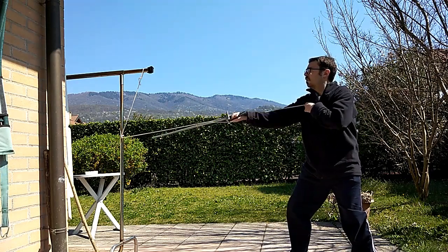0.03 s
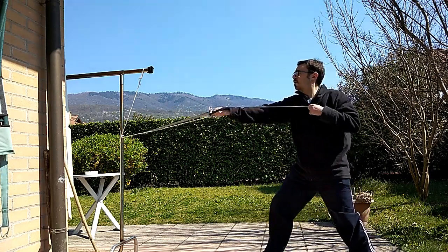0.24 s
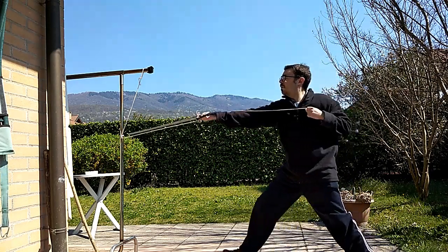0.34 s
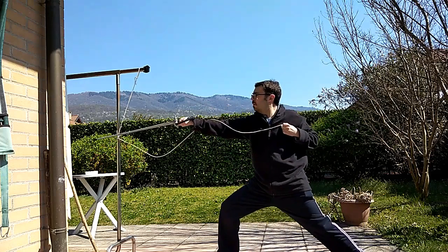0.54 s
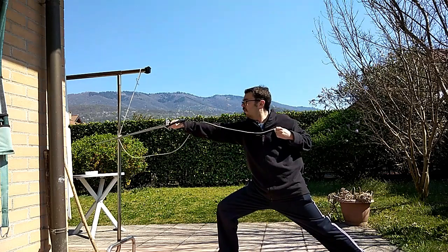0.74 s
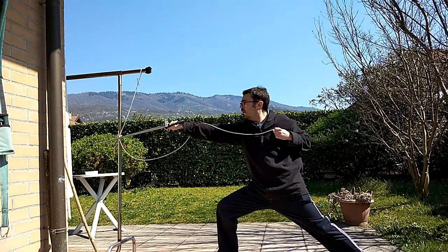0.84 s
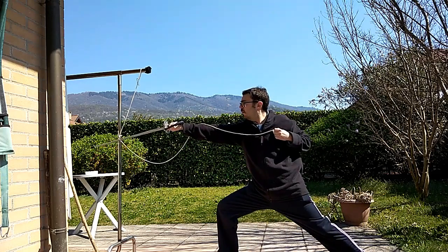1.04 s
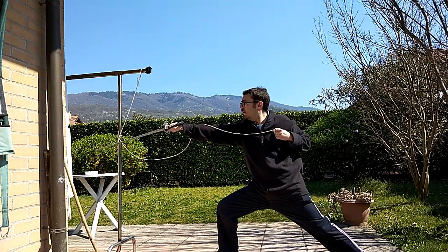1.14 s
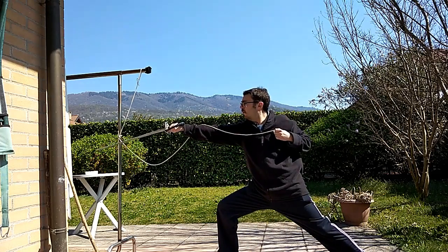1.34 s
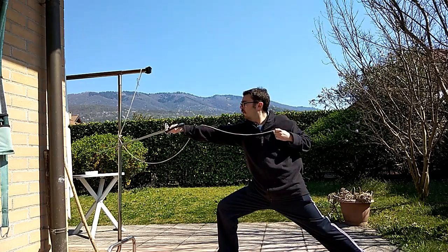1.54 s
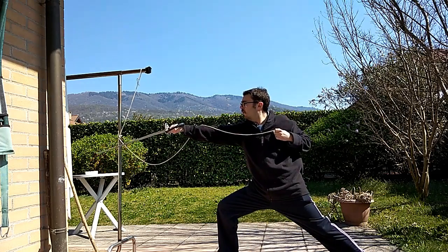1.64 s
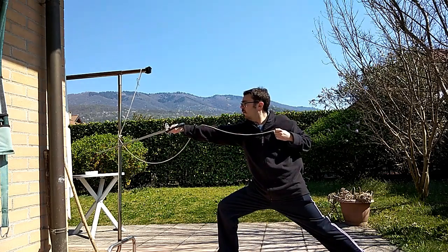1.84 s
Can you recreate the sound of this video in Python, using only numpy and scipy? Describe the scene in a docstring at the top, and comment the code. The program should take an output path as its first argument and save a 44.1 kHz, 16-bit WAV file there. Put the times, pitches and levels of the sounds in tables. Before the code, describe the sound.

A thin blade clacks sharply against a metal stand after a brief scrape along a cord, then rattles ever more weakly as the steel rings. Feet thud on patio tiles, with a short wall echo and a faint low drone.

```python
"""A thin blade scrapes along a cord hung from a metal stand as a fencer lunges on a patio.
The blade clacks against the stand and rattles on it ever more weakly, leaving the steel ringing,
while feet and the stand's base thud on the tiles. The house wall answers; a low drone and a few
faint far chirps lie underneath."""
import sys
import numpy as np
from scipy import signal
from scipy.fft import rfft, irfft, next_fast_len
from scipy.io import wavfile
from scipy.ndimage import map_coordinates

SR = 44100
rng = np.random.default_rng(int(sys.argv[2]) if len(sys.argv) > 2 else 0)


def bounce(signal):
    """Save signal as a 16-bit WAV file at the path given by the first command-line argument."""
    frames = np.transpose(np.atleast_2d(signal))
    limited = np.clip(frames, -1, 1)
    pcm = np.round(limited * 32767).astype(np.int16)
    wavfile.write(sys.argv[1], SR, pcm)


N = 83790
T = np.arange(N) / SR
LEFT_LAG_S = 0.00018


def amp(db):
    """Decibels to gain."""
    return 10 ** (np.asarray(db) / 20)


def decay(t, t60_s):
    """Exponential fall, 60 dB in t60_s."""
    return amp(-60 * t / t60_s)


def unit_rms(x):
    """Scale to rms 1."""
    return x / np.sqrt(np.mean(x ** 2) + 1e-20)


def curve_at(points, hz):
    """Interpolate (f/Hz, value) points on a log axis."""
    point_hz, values = np.transpose(points)
    return np.interp(np.log(hz + 0.0015), np.log(point_hz), values)


def wobble(rate_hz):
    """Smooth random curve with rate_hz knots a second."""
    return map_coordinates(rng.standard_normal(N // 4), [T * rate_hz + 2], mode="wrap")


def pan(pan_db):
    """Stereo gains for a left-minus-right level."""
    return amp(np.array([[0.5], [-0.5]]) * pan_db)


def add(out, start_s, sound):
    """Mix a sound in at start_s."""
    start = round(start_s * SR)
    out[:, start:start + sound.shape[1]] += sound[:, :N - start]


def mode(t, hz, t60_s, pan_db):
    """One damped vibration, slightly later on the left."""
    t = np.maximum(t - np.array([[LEFT_LAG_S], [0]]), 0)
    return decay(t, t60_s) * np.sin(2 * np.pi * hz * t) * pan(pan_db)


# left-right likeness: f/Hz, correlation
COHERENCE = [(100, 0.82), (300, .94), (600, .92), (1200, 0.42), (2500, 0.23), (5000, .3), (8300, 0.2)]
def shaped_noise(envelope, spectrum, pan_db):
    """Enveloped stereo noise rung through a minimum-phase filter, at the envelope's rms before panning."""
    size = len(envelope)
    n_fft = 2 * next_fast_len(size // 2 + 2048)
    hz = np.fft.rfftfreq(n_fft, 1 / SR)
    cepstrum = irfft(np.log(amp(curve_at(spectrum, hz))))
    causal = np.r_[1, np.full(n_fft // 2 - 1, 2), np.zeros(n_fft // 2)]
    response = np.exp(rfft(cepstrum * causal))
    mid, side = rfft(rng.standard_normal((2, size)) * envelope, n_fft) * response
    width = np.arccos(curve_at(COHERENCE, hz)) / 2
    mid, side = mid * np.cos(width), side * np.sin(width)
    left = (mid + side) * np.exp(-2j * np.pi * hz * LEFT_LAG_S)
    stereo = irfft([left, mid - side])[:, :size]
    return unit_rms(stereo) * np.sqrt(np.mean(envelope ** 2)) * pan(pan_db)


# air spectrum: f/Hz, level/dB
AIR_SPECTRUM = [(150, -1), (220, 0), (400, -18.5), (520, -13), (900, -20), (1450, -13.5),
                (2900, -25.5), (7100, -25.5), (14000, -31.5)]
def air():
    """Still air: a faint, steady noise."""
    return shaped_noise(np.full(N, amp(-77)), AIR_SPECTRUM, pan_db=-1.5)


# drone envelopes: t/s, upper/dB, lower/dB
DRONE_LEVELS = [(0.0, -79, -76), (0.074, -58.5, -66), (0.19, -92, -71), (0.28, -55, -57), (0.312, -79, -68),
                (0.444, -62.5, -77), (0.522, -74, -72.5), (0.84, -64.5, -62.5), (0.888, -80, -74),
                (0.952, -68, -69), (1.004, -68.5, -61.5), (1.136, -67, -76), (1.168, -53.5, -67.5),
                (1.418, -68, -64.5), (1.46, -51, -54.5), (1.502, -60, -66.5), (1.766, -58, -59.5),
                (1.9, -66, -73)]
# rumble spectrum: f/Hz, level/dB
RUMBLE_SPECTRUM = [(25, -36), (42, -20.5), (56, 6.5), (85, -4), (115, 3.5), (150, -7), (250, -18.5),
                   (380, -26.5), (900, -53)]
def drone(upper_hz=105.2, lower_hz=65.3, waver_rad=0.9):
    """Two wavering low tones in a rumble that swells with the lower one."""
    times_s, upper_db, lower_db = np.transpose(DRONE_LEVELS)
    upper = amp(np.interp(T, times_s, upper_db))
    lower = amp(np.interp(T, times_s, lower_db))
    tones = np.zeros(N)
    for hz, envelope in ((upper_hz, upper), (lower_hz, lower)):
        flutter = amp(4.9 * wobble(7.4))
        phase = 2 * np.pi * hz * T + waver_rad * wobble(11)
        tones += envelope * unit_rms(flutter * np.sin(phase))
    return amp(-2) * tones + shaped_noise(amp(-1) * lower, RUMBLE_SPECTRUM, pan_db=4)


# far chirps: t/s, length/s, f/Hz, level/dB
FAR_CHIRPS = [(1.394, 0.016, 1200, -70), (1.416, 0.083, 1360, -75), (1.482, 0.028, 1130, -75.5),
              (1.865, .03, 1520, -74.5)]
def far_chirps():
    """Short, faint tones with a jittering pitch."""
    out = np.zeros(N)
    for start_s, length_s, hz, db in FAR_CHIRPS:
        swell = np.sin(np.pi * np.clip((T - start_s) / length_s, 0, 1))
        out += amp(db) * swell * np.sin(2 * np.pi * hz * T + 1.2 * wobble(390))
    return out


# patio decay: f/Hz, t60/s
PATIO_T60 = [(100, 0.97), (400, 0.74), (1200, 0.6), (2000, 0.41), (5000, 0.44), (8000, 0.26), (14000, 0.15)]
# reverb send: f/Hz, level/dB
PATIO_SPECTRUM = [(100, -9.5), (500, -16.5), (1200, -8.5), (2000, -12), (5000, -16.5), (10000, -20)]
def patio_reverb(x, delay_s=0.013):
    """Walls and paving answer with a tail whose treble dies first."""
    hz, t, noise = signal.stft(rng.standard_normal((2, SR)), SR, nperseg=256)
    fade = decay(t, curve_at(PATIO_T60, hz)[:, None])
    energy = SR * np.mean(fade ** 2, axis=1, keepdims=True)
    gain = amp(curve_at(PATIO_SPECTRUM, hz))[:, None] / np.sqrt(energy)
    tail = signal.istft(noise * fade * gain, SR, nperseg=256)[1]
    tail = np.pad(tail, ((0, 0), (round(delay_s * SR), 0)))
    return signal.fftconvolve(x, tail, axes=1)[:, :N]


def wall_reflections(x, count=8, total_db=-10, highpass_hz=800):
    """Early echoes off house wall and paving colour the treble differently on each side."""
    taps = np.zeros((2, SR // 10))
    for side in taps:
        delays_s = rng.uniform(0.004, 0.028, count)
        side[(delays_s * SR).astype(int)] = rng.choice([-1, 1], count) * amp(total_db) / np.sqrt(count)
    treble = signal.sosfilt(signal.butter(2, highpass_hz, "high", fs=SR, output="sos"), x)
    return signal.fftconvolve(treble, taps, axes=1)[:, :N]


# base landings: t/s, relative level/dB
BASE_KNOCKS = [(1.611, -41), (1.685, -63), (1.75, -65)]
# base resonances: f/Hz, level/dB
BASE_SPECTRUM = [(200, -19), (420, -24.5), (510, -7), (570, -7.5), (680, 4.5), (750, -4), (860, -32),
                 (1200, -25.5), (1650, -20), (1830, -5), (2200, -15.5), (2700, -40.5), (3300, -22.5),
                 (5000, -34.5), (7700, -29.5), (9500, -57), (14000, -61)]
def base_knocks(rise_s=0.0015):
    """The stand's base rocks back onto the tiles with a hollow knock."""
    out, t = np.zeros((2, N)), T[:SR // 3]
    blow = (1 - np.exp(-t / rise_s)) * decay(t, t60_s=0.15)
    for start_s, db in BASE_KNOCKS:
        add(out, start_s, shaped_noise(amp(db - 2.5) * blow, BASE_SPECTRUM, pan_db=-4))
    return out


# thump spectrum: f/pitch, level/dB
THUMP_SPECTRUM = [(.1, -32), (.45, -5.5), (.75, -10), (1, -1.5), (1.25, -6.5), (1.7, -16), (4, -49.5),
                  (12, -60.5)]
def thump(t, rise, pitch_hz):
    """A dull impact: a band of noise and a damped tone at one pitch."""
    spectrum = [(pitch_hz * ratio, db) for ratio, db in THUMP_SPECTRUM]
    noise = shaped_noise(rise * decay(t, t60_s=0.2), spectrum, pan_db=-0.5)
    tone = rise * mode(t, pitch_hz, t60_s=0.13, pan_db=4.5)
    return amp(-3.5) * noise + amp(-1.5) * tone


# landings, levels relative: t/s, thump/dB, thump/Hz, slap/dB, slap/Hz, grit/dB, tube/dB
TILE_THUDS = [(0, -61, 211.8, -69, 365, -84, -109.5), (.253, -40, 328.6, -44.5, 644, -55, -64),
              (.268, -43, 205, -49, 441, -68, -72), (0.311, -49.5, 296, -58, 600, -65.5, -64.5),
              (.389, -55, 139.8, -43.5, 266.6, -58, -76.5), (0.442, -44.5, 277, -48, 489, -45, -66),
              (0.593, -46.5, 261, -53.5, 334, -63, -71), (0.659, -60, 224, -66, 293, -64, -66),
              (0.934, -41.5, 355, -46.5, 594.4, -49.5, -64), (0.952, -46.5, 147.2, -46, 229, -73, -80),
              (1.018, -55, 199.6, -68, 456, -70.5, -81), (1.159, -48, 192, -53, 440, -65.5, -66.5),
              (1.275, -46, 249, -65.5, 555, -66.5, -76), (1.621, -45, 268, -49.5, 357, -59.5, -73.5)]
# spectra of grit and of the stand's tube (also struck by the blade): f/Hz, level/dB
GRIT_SPECTRUM = [(300, -9.5), (900, 5), (1600, 5), (2300, 3.5), (3200, -8), (5000, -12.5), (7700, -12.5),
                 (9500, -38), (14000, -47.5)]
TUBE_SPECTRUM = [(600, -17.5), (1400, -12.5), (1700, -9.5), (1870, 7.5), (2080, 6), (2280, 1), (2700, -15),
                 (4000, -35)]
def tile_thuds(rise_s=0.00075):
    """Weight lands on the tiles: a low thump, a hollow slap, grit and a shake of the stand's tube."""
    out, t = np.zeros((2, N)), T[:SR // 3]
    rise = 1 - np.exp(-t / rise_s)
    crunch = rise * decay(t, t60_s=0.27)
    for start_s, thump_db, thump_hz, slap_db, slap_hz, grit_db, tube_db in TILE_THUDS:
        low = amp(thump_db) * thump(t, rise, thump_hz)
        slap = amp(slap_db) * thump(t, rise, slap_hz)
        grit = shaped_noise(amp(grit_db) * crunch, GRIT_SPECTRUM, pan_db=-9)
        tube = shaped_noise(amp(tube_db) * crunch, TUBE_SPECTRUM, pan_db=-0.5)
        add(out, start_s, low + slap + grit + tube)
    return amp(-0.5) * out


# strokes on the cord, levels relative: t/s, length/s, hiss/dB, rasp/dB
CORD_STROKES = [(0, 0.077, -70.5, -83), (0.079, 0.29, -63, -75), (0.11, 0.03, -49, -50),
                (0.21, 0.056, -46.5, -52), (.27, 0.048, -79, -65), (1.278, 0.018, -67, -83),
                (1.338, 0.036, -79, -85)]
# scrape spectra: f/Hz, level/dB
HISS_SPECTRUM = [(3000, -37), (6000, -23.5), (6900, -6), (7350, -3), (8100, -8.5), (9000, -26.5),
                 (11000, -25), (14000, -40)]
RASP_SPECTRUM = [(400, -23.5), (1100, -12.5), (1500, -2.5), (2300, 1), (3300, 0.5), (5500, 3.5),
                 (9000, 6.5), (12000, -19.5), (14000, -35)]
def cord_scrapes(attack_s=0.021, roughness_db=0.5):
    """The edge slides over the cord's fibres: a grainy hiss in the blade above a broad rasp."""
    hiss_envelope, rasp_envelope = np.zeros((2, N))
    for start_s, length_s, hiss_db, rasp_db in CORD_STROKES:
        attack = np.clip((T - start_s) / attack_s, 0, 1)
        release = decay(np.maximum(T - start_s - length_s, 0), t60_s=0.1)
        hiss_envelope += amp(hiss_db) * attack * release
        rasp_envelope += amp(rasp_db) * attack * release
    fibres = amp(roughness_db * wobble(600))
    hiss = shaped_noise(hiss_envelope * fibres, HISS_SPECTRUM, pan_db=-6.5)
    rasp = shaped_noise(rasp_envelope * fibres, RASP_SPECTRUM, pan_db=-12)
    return amp(-5) * (hiss + rasp)


# the stand's steel modes: f/Hz, level/dB
STEEL_MODES = [(1818, -3.5), (1877, -5.5), (1913, -6.5), (2230, -7), (2497, -7.5), (3499, -6.5),
               (4339, -6.5), (5245, -3)]
def steel_ring(t, spread_db=1.6):
    """The struck steel rings, each mode with a random strength and phase on each side."""
    ring = np.zeros((2, len(t)))
    for hz, db in STEEL_MODES:
        gain = amp(db + rng.normal(0, spread_db, (2, 1)))
        ring += gain * np.sin(2 * np.pi * (hz * t + rng.random((2, 1))))
    return ring * decay(t, t60_s=0.26) * pan(-7.5)


# hollow frame modes: f/Hz, level/dB, t60/s
FRAME_MODES = [(593, -5.5, .11), (673, -3.5, 0.18)]
# frame knock spectrum: f/Hz, level/dB
FRAME_SPECTRUM = [(100, -26), (400, -20), (530, -7.5), (620, -6), (700, -8), (800, -14), (1100, -15),
                  (2000, -30.5)]
def frame_knock(t, buzz):
    """The stand's frame answers a contact with a noisy knock and its hollow modes."""
    hollow = sum(amp(db) * mode(t, hz, t60_s, pan_db=-4) for hz, db, t60_s in FRAME_MODES)
    return shaped_noise(amp(-2) * buzz, FRAME_SPECTRUM, pan_db=-1) + amp(-9) * hollow


# contacts, levels relative: t/s, crack/dB, tube/dB, ting/dB, knock/dB, rise/s, buzz t60/s, cutoff/Hz
BLADE_CONTACTS = [(0.387, -36.5, -63.5, -57, -39.5, 0.00024, 0.16, 11700),
                  (0.3893, -26.5, -18, -15.5, -36.5, 0.00044, 0.0029, 10730),
                  (.392, -30, -38.5, -28.5, -45, 0.0023, 0.28, 10420),
                  (0.4, -35.5, -38.5, -40.5, -46, 0.0006, .22, 9310),
                  (.467, -30.5, -29, -33, -52, 0.0005, 0.16, 12020),
                  (0.485, -35.5, -36.5, -65, -76, .001, 0.13, 7860),
                  (.534, -39, -51, -46.5, -48.5, 0.001, 0.15, 9000),
                  (0.5973, -32, -45.5, -39, -55, 0.0007, 0.13, 12900),
                  (0.689, -43.5, -42, -58, -91, 0.002, 0.15, 10200),
                  (.797, -47.5, -48, -50, -49.5, 0.0041, 0.18, 7900),
                  (0.821, -42, -56, -62, -59, 0.0021, 0.1, 8100),
                  (1.158, -44, -51, -46.5, -57, 0.0042, .11, 7800)]
# spectra of the contact's crack and the blade's ting: f/Hz, level/dB
CRACK_SPECTRUM = [(150, -27.5), (500, -2), (1000, -6.5), (1500, 0), (2600, 4), (3200, -1.5), (3500, 0.5),
                  (3750, -3), (4000, 3.5), (4340, 2.5), (4650, 0.5), (5200, 3), (5500, -1), (6200, -2),
                  (7600, 5), (9000, -3), (10200, -11.5), (12500, -10.5), (14400, -19.5)]
TING_SPECTRUM = [(5500, -35.5), (7200, -4.5), (7900, -9.5), (8350, -2), (8700, -5.5), (9000, 0),
                 (9700, -17.5), (11000, -22.5), (14000, -38)]
def blade_clacks():
    """Each contact snaps, buzzes in tube and blade and rings the steel; glancing ones are duller."""
    out, t = np.zeros((2, N)), T[:SR * 2 // 3]
    snap = amp(-2) * decay(t, t60_s=0.018)
    for start_s, crack_db, tube_db, ting_db, knock_db, rise_s, t60_s, cutoff_hz in BLADE_CONTACTS:
        buzz = (1 - np.exp(-t / rise_s)) * (decay(t, t60_s) + snap)
        ring = amp(crack_db - 26) * steel_ring(t)
        crack = shaped_noise(amp(crack_db - 5) * buzz, CRACK_SPECTRUM, pan_db=-9)
        tube = shaped_noise(amp(tube_db - 8) * buzz, TUBE_SPECTRUM, pan_db=-5.5)
        ting = shaped_noise(amp(ting_db - 5.5) * buzz, TING_SPECTRUM, pan_db=-0.4)
        knock = amp(knock_db) * frame_knock(t, buzz)
        lowpass = signal.butter(6, cutoff_hz, fs=SR, output="sos")
        add(out, start_s, signal.sosfilt(lowpass, crack + tube + ting + knock + ring))
    return out


def scene():
    """The lunge and its echoes over the quiet background."""
    lunge = blade_clacks() + tile_thuds() + base_knocks() + cord_scrapes()
    return lunge + wall_reflections(lunge) + patio_reverb(lunge) + drone() + far_chirps() + air()


def record(dry):
    """Brick-wall low-pass on the whole sound."""
    cutoff_hz = 14450
    n_fft = next_fast_len(N + SR // 4)
    passband = np.fft.rfftfreq(n_fft, 1 / SR) < cutoff_hz
    return irfft(rfft(dry, n_fft) * passband, n_fft)[:, :N]


dry = scene()
out = record(dry)
bounce(out)
```